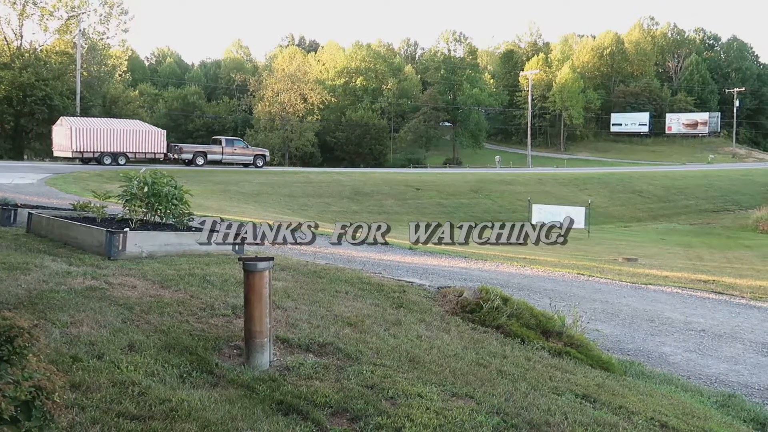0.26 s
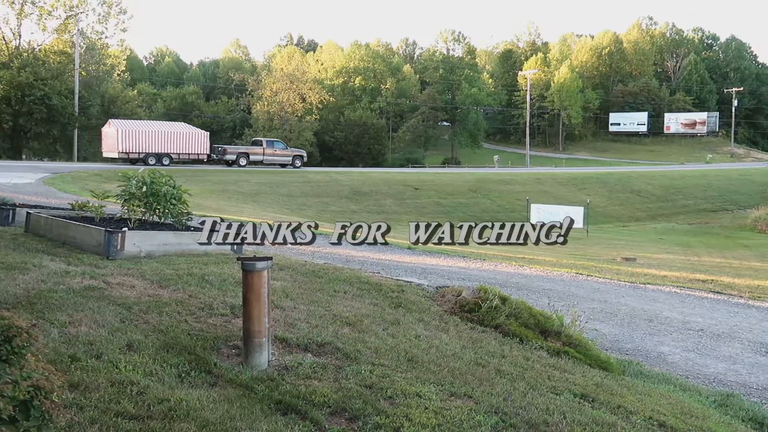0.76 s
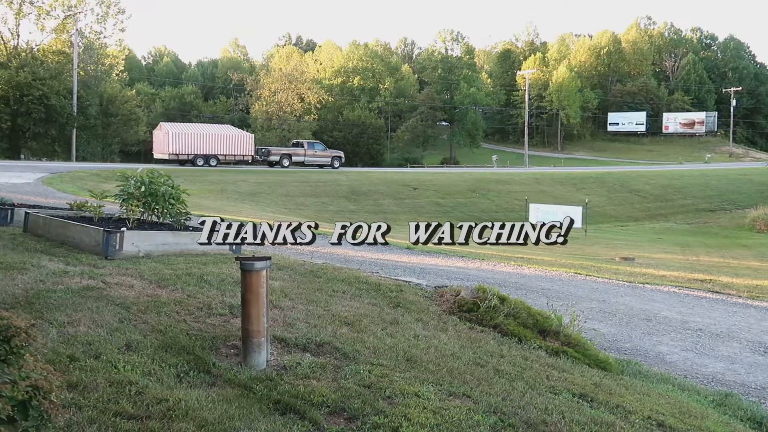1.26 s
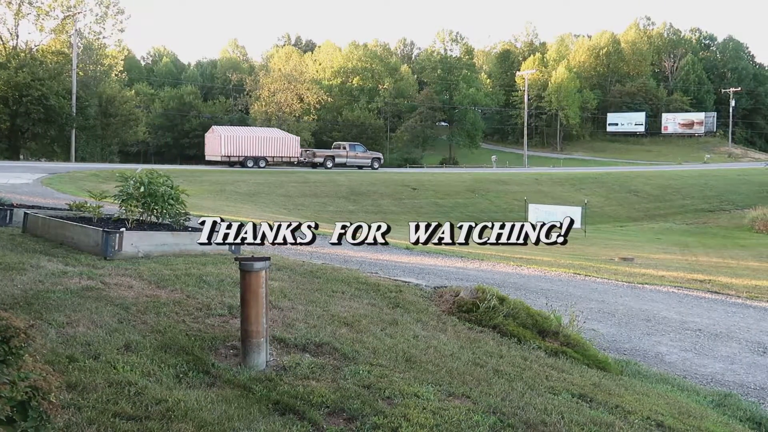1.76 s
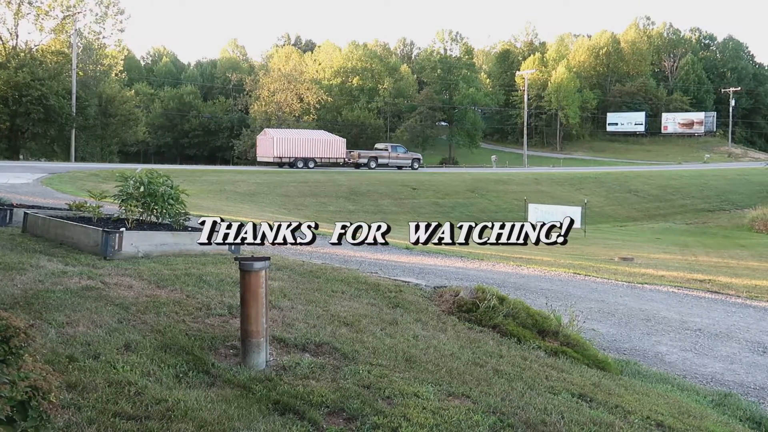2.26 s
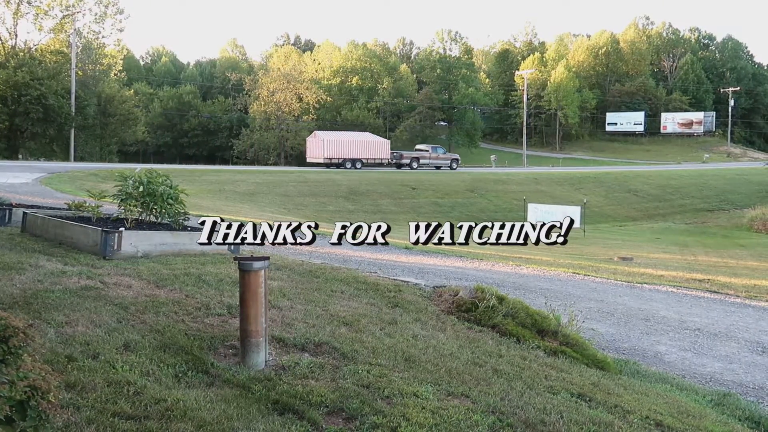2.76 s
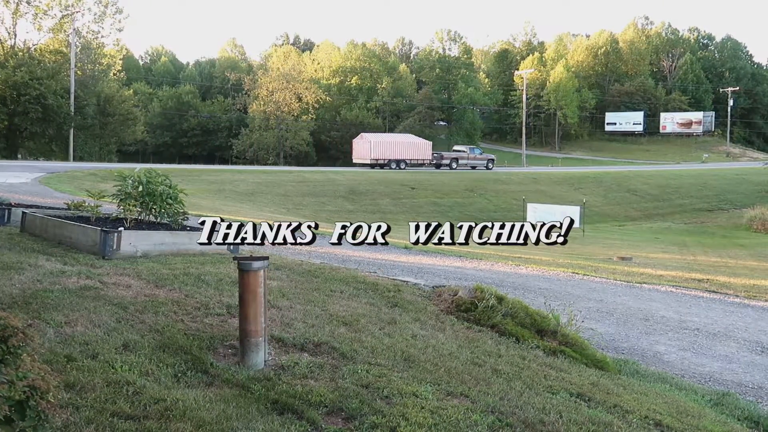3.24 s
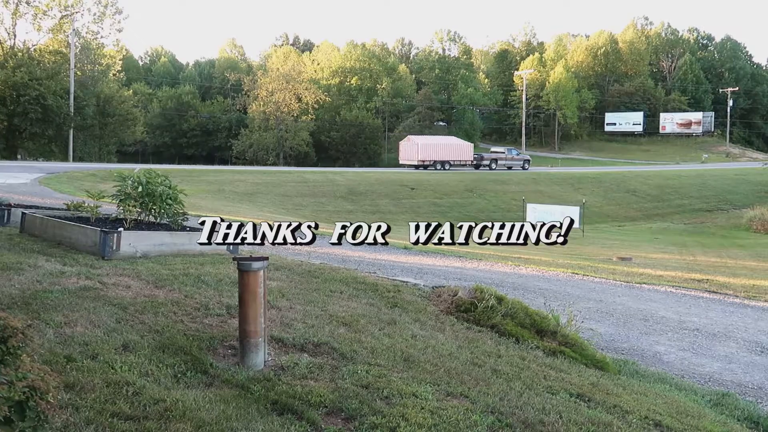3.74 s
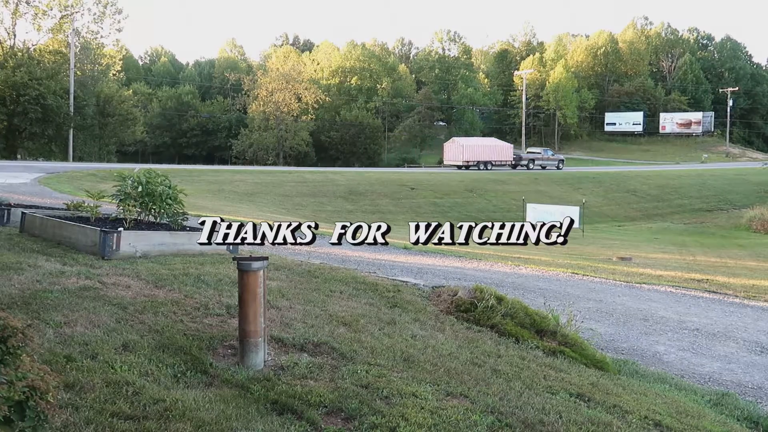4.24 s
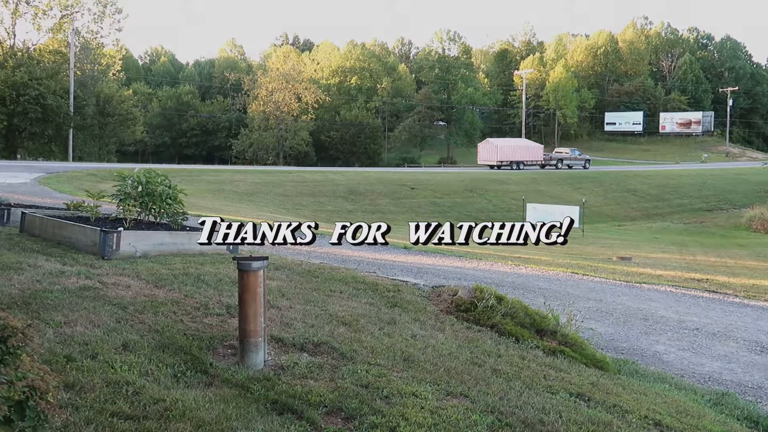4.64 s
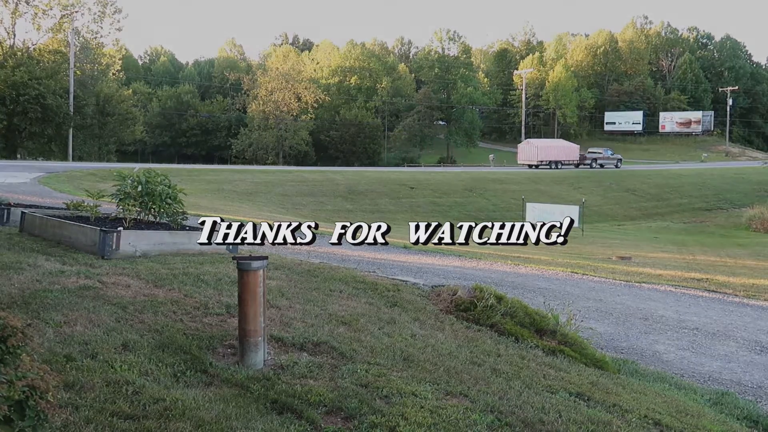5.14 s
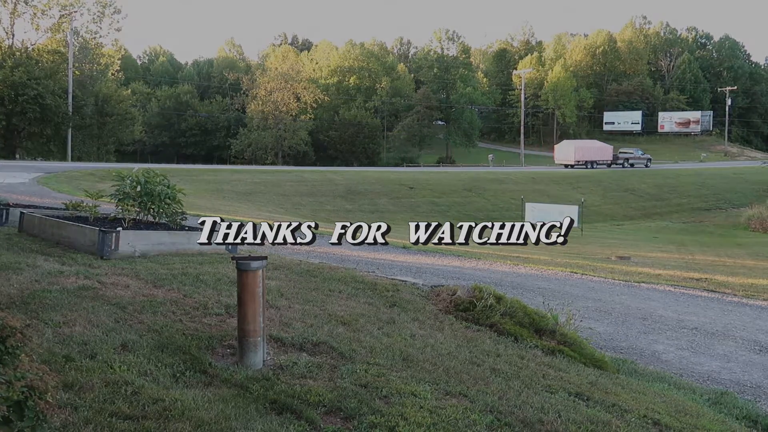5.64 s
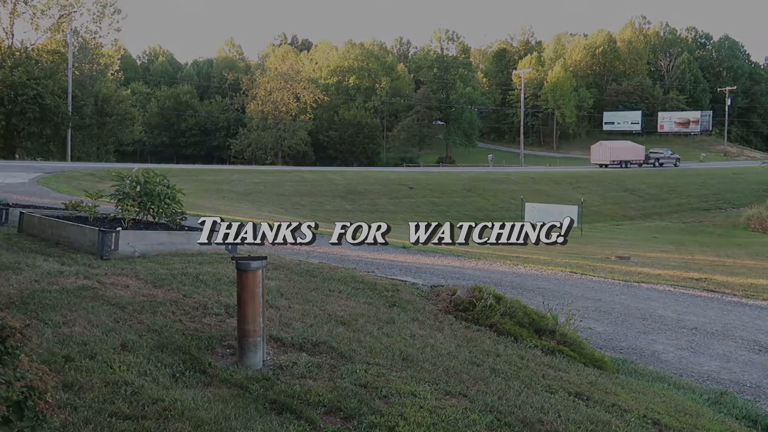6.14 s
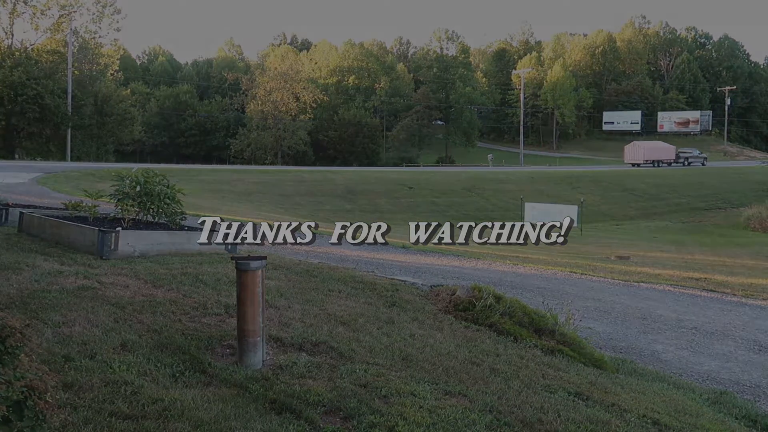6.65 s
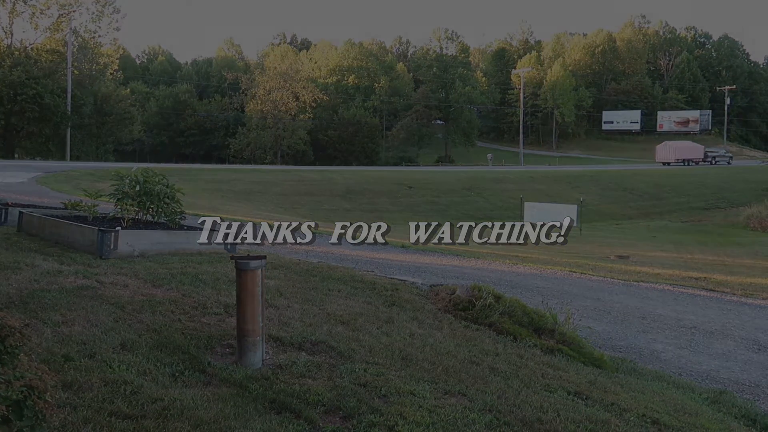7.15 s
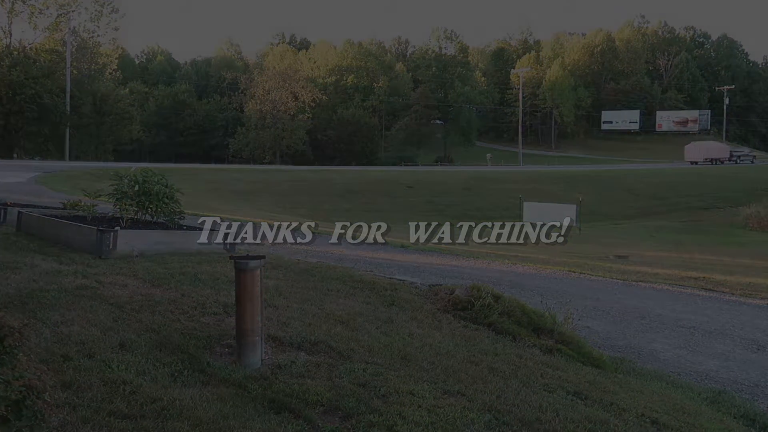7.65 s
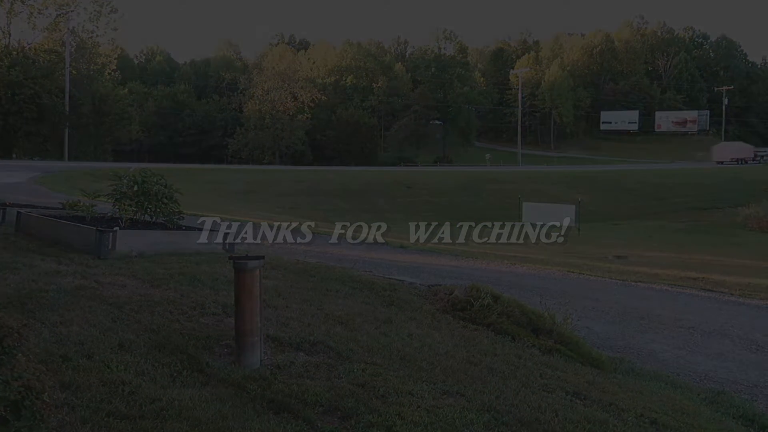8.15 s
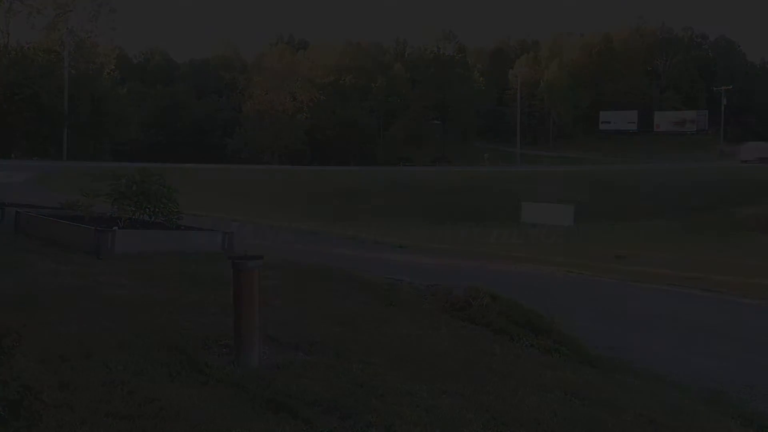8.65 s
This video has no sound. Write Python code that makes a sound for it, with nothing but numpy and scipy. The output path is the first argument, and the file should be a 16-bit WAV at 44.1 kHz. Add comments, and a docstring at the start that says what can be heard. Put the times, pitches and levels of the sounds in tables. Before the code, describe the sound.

A diesel pickup pulling a trailer passes on a country road, heard from a lawn some distance away. Its strong low drone and rattly clatter climb for three seconds, drop at a gear change, then climb again over soft tyre hiss. As it draws away the clatter dulls, and everything fades steadily almost to silence. A couple of faint ticks sound near the microphone.

```python
"""A six-cylinder diesel pickup, towing a trailer past a lawn on a country road, changes gear once.
Exhaust: drone and octave at the firing rate, weaker tones from unequal cylinders, swelling crank harmonics.
Engine clatter and tyre roar: noise gated by the firings, coloured by view, gliding body resonances and
a reflection; low rumble puffs with the firings. Two faint ticks nearby; a long fade runs to the end."""
import sys
import numpy as np
from scipy import signal
from scipy.fft import rfft, irfft, next_fast_len
from scipy.io import wavfile
from scipy.ndimage import uniform_filter1d

SR = 44100
rng = np.random.default_rng(int(sys.argv[2]) if len(sys.argv) > 2 else 0)


def store_wav(level_fs):
    """Save 16-bit WAV to argv[1]."""
    pcm = np.round(np.clip(np.atleast_2d(level_fs), -1, 1) * 32767)
    wavfile.write(sys.argv[1], SR, pcm.T.astype(np.int16))


N = 392490
T = np.arange(N) / SR
FRAME = 1024
HZ = np.fft.rfftfreq(FRAME, 1 / SR)

# times of the front, side, rear-quarter and rear views [s]
VIEW_TIMES_S = [0.599, 2.6, 4.799, 7.0]


def gain_of(db):
    """Amplitude ratio of a level in dB."""
    return 10 ** (np.asarray(db) / 20)


def evened(x):
    """x scaled to rms 1."""
    return x / np.sqrt(np.mean(x ** 2) + 1e-20)


def read(points, hz):
    """A spectrum joined by straight lines on a log-frequency axis."""
    f, value = np.transpose(points)
    return np.interp(np.log(hz + 1), np.log(f + 1), value)


def follow(rows, t):
    """The columns of a curve at the times t."""
    s, *columns = np.transpose(rows)
    return [np.interp(t, s, column) for column in columns]


def drift(hz):
    """Slow random curve of rms 1, up to about hz."""
    size, rate_hz = 4096, 200
    f = np.fft.rfftfreq(size, 1 / rate_hz)
    spectrum = rfft(rng.standard_normal(size)) * np.exp(-(f / hz) ** 2)
    return np.interp(T, np.arange(size) / rate_hz, evened(irfft(spectrum)))


def noise(colour, gate=1):
    """Noise of rms 1 with the given spectrum, gated before it is coloured."""
    size = next_fast_len(N, True)
    filter_gain = gain_of(read(colour, np.fft.rfftfreq(size, 1 / SR)))
    spectrum = rfft(gate * rng.standard_normal(N), size) * filter_gain
    return evened(irfft(spectrum, size)[:N])


def spectra(x):
    """Short-time spectra, one row a frame."""
    return signal.stft(x, nperseg=FRAME, noverlap=FRAME * 3 // 4)[2].T


def wave(z):
    """Waveform of short-time spectra."""
    return signal.istft(z.T, nperseg=FRAME, noverlap=FRAME * 3 // 4)[1][:N]


def at_level(gain, db, band):
    """Scales each moment of a gain field so that white noise leaves it with db in the band."""
    band_rms = np.sqrt((gain ** 2 * band).mean(1))
    return gain * (gain_of(db) / band_rms)[:, None]


def distance_db(t):
    """Straight-line pass: level falls with distance, 0 dB at the nearest point."""
    road_m, truck_m_per_s, nearest_s = 47.4, 16.1, 1.08
    bearing_rad = np.arctan(truck_m_per_s * (t - nearest_s) / road_m)
    return 20 * np.log10(np.cos(bearing_rad))


def ticks():
    """Short bright noise puffs, different in each ear."""
    # start_s, level_db, rise_s, decay_s
    tick_rows = [(3.384, -41.5, .01, .016), (5.186, -31, .0005, .0015)]
    # pitch_hz, density_db_per_hz (relative)
    tick_colour = [(1000, 0), (3000, 8), (5500, 10), (9000, 3), (12000, -6), (15000, -30)]
    envelope = np.zeros(N)
    for start_s, level_db, rise_s, decay_s in tick_rows:
        age_s = np.maximum(T - start_s, 0)
        decay = np.exp(-np.maximum(age_s - rise_s, 0) / decay_s)
        envelope += gain_of(level_db) * np.minimum(age_s / rise_s, 1) * decay
    return envelope * np.array([noise(tick_colour), noise(tick_colour)])


def rumble(cycles, nearest_db=-30.5, side_db=-22.0):
    """Low turbulence puffs out with each firing and stops in between, nearly the same in both ears."""
    # exhaust turbulence and road rumble: pitch_hz, density_db_per_hz (relative)
    rumble_colour = [(10, -11.5), (25, -9.5), (40, -7), (60, -5), (85, -6), (110, 0.5), (140, -2.5),
                     (180, -6.5), (225, -9.5), (270, -18.5), (400, -37.5), (1500, -120)]
    gate = evened(np.cos(np.pi * 6 * cycles) ** 4)
    mid = noise(rumble_colour, gate)
    side = gain_of(side_db) * np.outer([1, -1], noise(rumble_colour))
    return gain_of(nearest_db + distance_db(T)) * (mid + side)


def panel(age_s, hz, width_hz, half_s, glide_hz_per_s):
    """Strength 0-1 of one resonance, which swells, glides and sinks; age counts from its loudest moment."""
    offset_hz = HZ - hz - glide_hz_per_s * age_s
    return np.exp(-(offset_hz / width_hz) ** 2 - (age_s / half_s) ** 2)


def sheen_db(t):
    """A bright band in the tyre hiss sinks in pitch as the truck draws away."""
    from_s, start_hz, sag_hz_per_s, width_hz, lift_db = 3.4, 5750, 270, 290, 4
    age_s = t[:, None] - from_s
    centre_hz = start_hz - sag_hz_per_s * age_s
    return lift_db * np.clip(2 * age_s, 0, 1) * np.exp(-((HZ - centre_hz) / width_hz) ** 2)


def radiation(t, clatter_db=-28, patchy_db=1.2, notch_hz=455):
    """Relative gain over time and frequency: view, resonances, reflections, hiss and distance."""
    # clatter and roar: pitch_hz, then relative front, side, rear_quarter, rear (density_db_per_hz)
    view_colour = [(143, -19, -10.5, -6.5, -4.5), (216, -5.5, -6.5, 2.5, 0.5), (294, -7.5, -6.5, -3.5, -1),
                   (414, -4.5, -4, -4, -2.5), (546, -5.5, -1.5, -1, -0.5), (734, -9.5, -6.5, -2, -0.5),
                   (930, -1.5, 0, -6, -5), (1212, -3.5, -2.5, -4, -2.5), (1468, -1.5, -5, -13.5, -12),
                   (1970, -14, -14, -17.0, -14.0), (2370, -11.0, -15.0, -17, -13.5),
                   (2866, -10.5, -11.5, -14.5, -15.5), (3330, -21.0, -18, -20, -16.5),
                   (4200, -18.5, -16, -27, -23)]
    # body resonances as the truck turns past: pitch_hz, width_hz, loudest_s, half_s, glide_hz_per_s, lift_db
    panel_rows = [(758, 42, 3.6, 1.8, 10, 8.5), (912, 58, 0.7, 1.1, 10, 5.5), (1600, 90, 0.3, 0.7, 0, 3.5),
                  (1173, 49, 0.2, 0.6, 0, 5.0), (1046, 59, 0.9, 0.5, 0, 4.0),
                  (1205, 69, 3.2, 1.2, -30, 5.0), (1055, 72, 5.7, 1.9, 0, 5.0),
                  (1441, 53, 4.0, 0.8, -30, 9.0), (1590, 73, 2.8, 0.9, -10, 7.5),
                  (1582, 52, 4.6, 0.5, 10, 6.5), (1695, 48, 5.9, 1.5, 10, 5.5),
                  (2000, 114, 0.8, 1.8, 0, 7.5), (2151, 71, 3.7, 0.5, -80, 6.5),
                  (2015, 52, 4.8, 0.8, -80, 4.5), (2305, 70, 6.8, 1.1, 0, 8),
                  (2389, 51, 2.4, 0.3, -50, 5.5), (2370, 82, 1.0, 0.6, 0, 6.0),
                  (2545, 38, 0.9, 0.65, 0, 8.5), (2767, 77, 2.7, 0.6, -180, 5.5),
                  (2337, 78, 4.7, 1.1, -170, 4.0), (2718, 53, 5.6, 0.9, -60, 7),
                  (2802, 123, 8.2, 0.9, 10, 6.5), (6540, 770, 3.9, 0.9, 0, 3.5)]
    # reflection strength: pitch_hz, share
    echo_share = [(300, .01), (900, 0.15), (1400, 0.22), (1850, 0.27), (2400, 0.076), (3300, 0.088),
                  (7000, 0.12)]
    # tyre hiss dulled by the air: pitch_hz, density_db_per_hz (relative)
    hiss_colour = [(3000, -1.5), (3500, -0.5), (4200, 0), (5500, -0.5), (7000, -7.5), (8500, -14.5),
                   (10500, -21), (12000, -28.5), (14500, -53.5)]
    # tyre hiss before the overall trim: time_s, level_db
    hiss_level = [(0, -49), (0.45, -50), (0.9, -46.5), (1.5, -48.5), (2.2, -49.5), (3.3, -51), (4.2, -49.5),
                  (5, -52), (5.7, -53.5), (6.5, -49.5), (7.3, -52.5), (8.9, -55)]

    facing = np.array([np.interp(t, VIEW_TIMES_S, row) for row in np.eye(len(VIEW_TIMES_S))]).T
    hz, *views = np.transpose(view_colour)
    view_db = facing @ np.array([read(np.c_[hz, view], HZ) for view in views])

    # many weak ground paths: slowly shifting peaks and dips
    patches = uniform_filter1d(rng.standard_normal(view_db.shape), size=150, axis=0)
    patches = uniform_filter1d(patches, size=2, axis=1)
    lift_db = patchy_db * evened(patches)
    for centre_hz, width_hz, loudest_s, half_s, glide_hz_per_s, panel_db in panel_rows:
        lift_db += panel_db * panel(t[:, None] - loudest_s, centre_hz, width_hz, half_s, glide_hz_per_s)
    lift_db += sheen_db(t)

    # a path about 2 ms longer cuts evenly spaced notches
    comb = abs(1 - read(echo_share, HZ) * np.exp(2j * np.pi * HZ / notch_hz))
    ripple = gain_of(lift_db) * comb
    hiss_db, = follow(hiss_level, t)
    body_band, hiss_band = (HZ > 400) & (HZ < 3000), (HZ > 3500) & (HZ < 9000)
    body = at_level(ripple * gain_of(view_db), clatter_db + distance_db(t), body_band)
    hiss = at_level(ripple * gain_of(read(hiss_colour, HZ)), hiss_db, hiss_band)
    high = np.interp(HZ, [3200, 4200], [0, 1])
    return (1 - high) * body + high * hiss


def knocks(cycles, burn_spread_db=1.6, ring_firings=0.93, memory_s=0.699, size=3072):
    """Cylinders knock unequally in a pattern repeated each cycle, slowly changing as the truck turns past.
    Returns the repeating knocks and the fresh noise that pulses gently with them."""
    # unequal knocks in firing order: level_db (relative)
    cylinder_db = [3.5, -1, -3.5, 1.5, -3.5, -2]
    # steady wash smears the knocks: share_of_knock in the front, side, rear-quarter and rear views
    wash_share = [.35, .55, .8, 1.3]
    firing = (6 * cycles).astype(int)
    # no two firings burn quite alike
    burn_db = burn_spread_db * rng.standard_normal(firing[-1] + 1)
    strength = gain_of(np.take(cylinder_db, firing % 6) + burn_db[firing])
    pulse = strength * np.exp(-(6 * cycles % 1) / ring_firings)
    gate = evened(np.interp(T, VIEW_TIMES_S, wash_share) + pulse)

    patterns = rng.standard_normal((64, size))
    place = (cycles % 1 * size).astype(int)
    age = T / memory_s
    old = age.astype(int)
    blend = age % 1 * np.pi / 2  # equal-power crossfade
    repeating = np.cos(blend) * patterns[old, place] + np.sin(blend) * patterns[old + 1, place]
    fresh = evened(gate ** 0.15) * rng.standard_normal(N)
    return gate * repeating, fresh


def clatter(cycles, trim_db=0.17, side_trim_db=-0.5):
    """Knocks and roar reach two microphone ports directly, and faintly from all sides off the trees."""
    # part repeating every engine cycle: pitch_hz, power_share
    repeat_share = [(250, .4), (500, .35), (1000, .62), (1600, .6), (2800, .52), (5000, .06)]
    # stereo width before side_trim_db: pitch_hz, side_minus_mid_db
    side_level = [(250, -19.5), (500, -23.5), (1000, -19.5), (2000, -15), (3000, -12.5), (4000, -7.5),
                  (5400, -5), (6300, -5.5), (8000, 0), (12000, 2.5)]
    # part of the side signal from a lag between the ports: pitch_hz, share
    lag_share = [(4500, 0.064), (5300, 0.69), (6300, .35), (8000, .35), (12000, .1)]
    # unequal port colour: pitch_hz, left_minus_right_db
    port_balance = [(250, 1.5), (800, -0.1), (1280, 1.5), (1550, -2), (2300, -0.5), (4600, -0.5),
                    (5300, 1.5), (6500, 0.5), (12000, -0.5)]
    repeating, fresh = (spectra(x) for x in knocks(cycles))
    gain = gain_of(trim_db) * radiation(np.linspace(0, N / SR, len(fresh)))
    share = np.clip(read(repeat_share, HZ), 0, 1)
    lag = np.clip(read(lag_share, HZ), 0, 1)
    direct = np.sqrt(share) * repeating + np.sqrt(1 - share) * fresh
    scattered = spectra(rng.standard_normal(N))
    side = np.sqrt(1 - lag ** 2) * scattered - 1j * lag * direct
    side = gain_of(read(side_level, HZ) + side_trim_db) * side
    lean = gain_of(read(port_balance, HZ) / 2)
    return np.array([wave(gain * (direct + side) * lean), wave(gain * (direct - side) / lean)])


def swells(cycles, trim_db=2.0, comb_db=-55, flutter_db=2.0, waver_rad=0.54, waver_hz=5):
    """A faint crank-harmonic comb glides with the revs; single ones swell and sink as the truck turns past."""
    # harmonics that sing out: multiple_of_cycle, loudest_s, half_s, level_db (before trim_db)
    swell_rows = [(14, 5.1, .3, -41), (15, 1.85, .33, -36), (18, 3.7, .4, -44), (24, 5.4, .5, -46),
                  (30, .2, .3, -46), (30, 2.8, .3, -44), (30, 4.45, .28, -44), (36, 2.2, .3, -40.5),
                  (36, 4.1, .6, -45), (36, 8.6, .4, -46), (42, 6.3, .7, -47), (44, 2.25, .2, -45),
                  (48, 2.75, .28, -46), (51, 2.85, .3, -42), (53, 2.8, .22, -45), (51, 4.9, .55, -42),
                  (54, 1.2, .4, -44), (56, 3.6, .3, -41), (57, 3.7, .38, -43), (63, 1.65, .28, -42),
                  (66, 2.75, .3, -45), (69, .6, .6, -42), (69, 6.2, .3, -46), (72, 7.4, .55, -46),
                  (79, 1.1, .3, -44), (87, 4.0, .25, -45)]
    levels = {order: gain_of(comb_db + distance_db(T)) for order in range(21, 91, 3)}
    for order, loudest_s, half_s, level_db in swell_rows:
        swell = gain_of(level_db + trim_db) * np.exp(-.5 * ((T - loudest_s) / half_s) ** 2)
        levels[order] = np.hypot(levels.get(order, 0), swell)
    out = np.zeros(N)
    for order, level in levels.items():
        phase = 2 * np.pi * (order * cycles + rng.random()) + waver_rad * drift(waver_hz)
        out += level * gain_of(flutter_db * drift(waver_hz)) * np.cos(phase)
    return np.sqrt(2) * out


def exhaust(cycles, flutter_db=0.5, octave_flutter_db=1.5, octave_lag_rad=.7, waver=0.08, waver_hz=1.7):
    """Six firings a cycle give drone and lagging octave; unequal cylinders add tones that waver in the air."""
    # firing tone: time_s, level_db
    drone_level = [(0.0, -10), (0.79, -13.0), (1.25, -12), (1.6, -17), (2.05, -10.5), (2.56, -14),
                   (2.94, -8), (3.14, -15.5), (3.41, -11), (3.85, -18), (4.35, -13), (4.62, -13.5),
                   (5.96, -9), (6.74, -21), (7.26, -15), (8.9, -26)]
    # its octave: time_s, level_db
    octave_level = [(0, -21), (.45, -27.5), (.7, -32.5), (1.0, -29.5), (1.22, -40), (1.7, -28.5),
                    (2.1, -28.5), (2.55, -25.5), (2.75, -31.5), (3.1, -25), (3.3, -35), (3.62, -38),
                    (3.85, -26), (4.15, -31), (4.45, -25), (5.1, -31), (5.35, -35.5), (5.6, -27.5),
                    (6.25, -33), (7.1, -30), (8.9, -31.5)]
    # unequal cylinders: multiple_of_cycle, then front, side, rear_quarter, rear (level_db)
    uneven_rows = [(4, -46.5, -48, -40, -42), (5, -44.5, -64.5, -59.5, -62),
                   (7, -48.5, -48.5, -43.5, -64.5), (8, -29.5, -34, -30, -31), (9, -33, -37, -34.5, -37.5),
                   (10, -30, -34, -36, -40), (13, -50, -46.5, -45, -45.5), (14, -58, -40, -57, -47),
                   (15, -45.5, -40, -41, -46), (17, -46.5, -62.5, -44.5, -61), (18, -58, -47, -41, -51.5)]
    firing_db, = follow(drone_level, T)
    octave_db, = follow(octave_level, T)
    turn = 2 * np.pi * cycles
    out = gain_of(firing_db + flutter_db * drift(12)) * np.cos(6 * turn)
    # the pipe delays the octave, so each pulse leans
    octave_phase = 12 * turn - octave_lag_rad + .3 * drift(.8)
    out += gain_of(octave_db + octave_flutter_db * drift(8)) * np.cos(octave_phase)
    for order, *view_db in uneven_rows:
        air = 1 + waver * drift(waver_hz)
        phase = order * turn + 2 * np.pi * rng.random() + waver * drift(waver_hz)
        out += gain_of(np.interp(T, VIEW_TIMES_S, view_db)) * air * np.cos(phase)
    return np.sqrt(2) * out


def scene():
    """One engine-cycle count drives all engine layers; revs climb, drop at the gear change, climb again."""
    # engine speed: time_s, firing_hz
    engine_speed = [(0.0, 77.5), (0.44, 78.3), (1.7, 82.7), (2.92, 90.1), (3.2, 81.3), (3.81, 80.8),
                    (4.3, 83.3), (4.71, 87.4), (5.25, 90.0), (6.68, 90.9), (7.2, 92.6), (8.9, 94.8)]
    firing_hz, = follow(engine_speed, T)
    cycles = np.cumsum(firing_hz) / SR / 6
    # left and right trims in dB
    tones = exhaust(cycles) * gain_of([[-.1], [.1]]) + swells(cycles) * gain_of([[.4], [-.4]])
    onset = np.minimum(T / .003, 1)
    return onset * (tones + clatter(cycles) + rumble(cycles) + ticks())


def record(dry):
    """Straight fade, about 20 dB down at the end, then a low-pass band limit."""
    fade_from_s, fade_to_s, edge_hz = 5.43, 9.295, 14900  # the fade would reach silence after the end
    faded = dry * np.clip((fade_to_s - T) / (fade_to_s - fade_from_s), 0, 1)
    low_pass = signal.firwin(511, edge_hz, window=("kaiser", 9), fs=SR)
    return signal.oaconvolve(faded, low_pass[None], "same")


dry = scene()
out = record(dry)
store_wav(out)
```